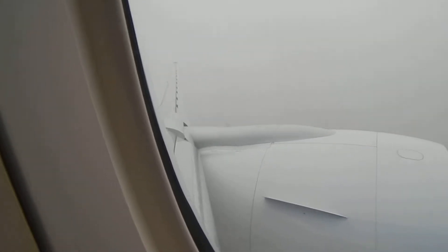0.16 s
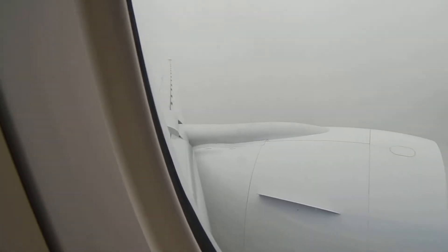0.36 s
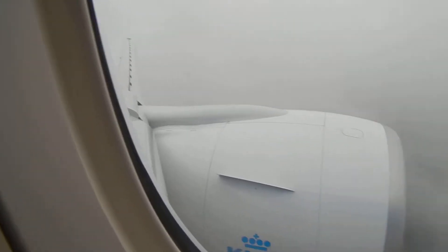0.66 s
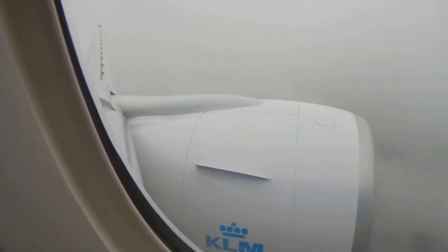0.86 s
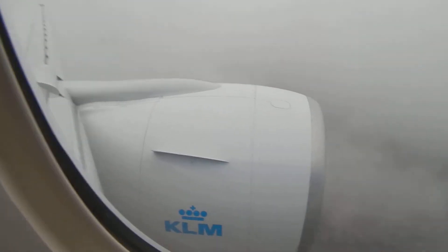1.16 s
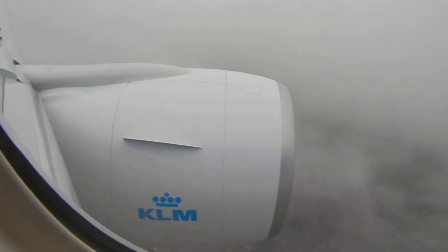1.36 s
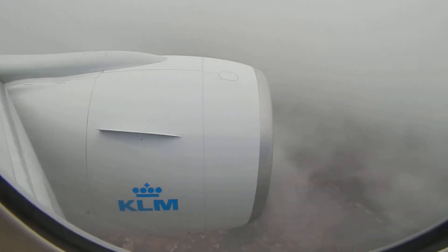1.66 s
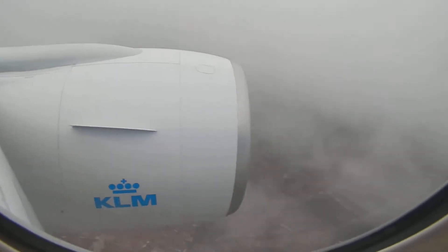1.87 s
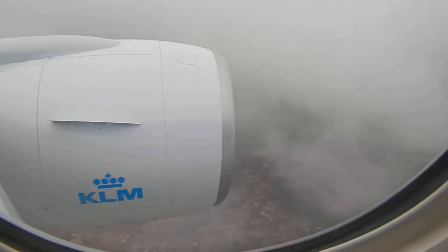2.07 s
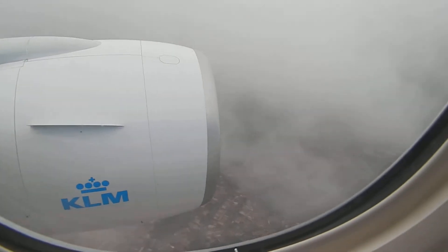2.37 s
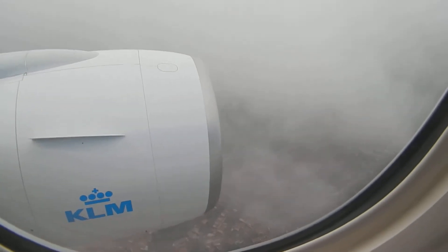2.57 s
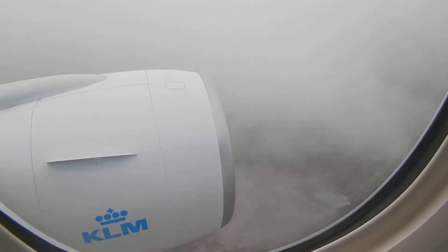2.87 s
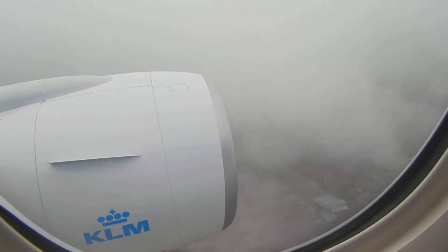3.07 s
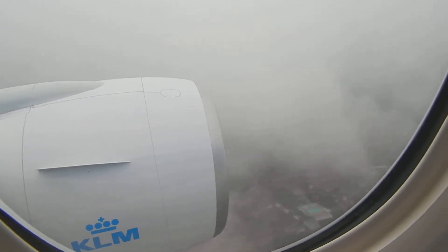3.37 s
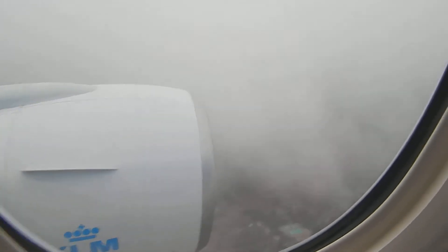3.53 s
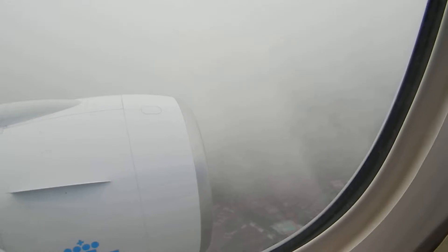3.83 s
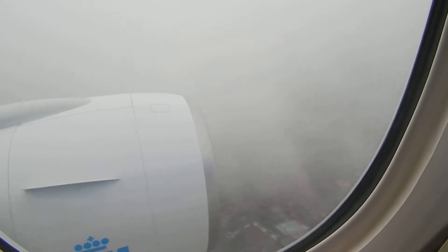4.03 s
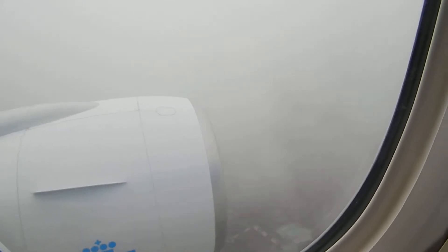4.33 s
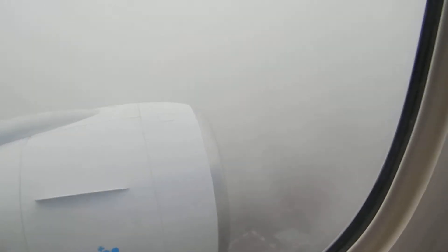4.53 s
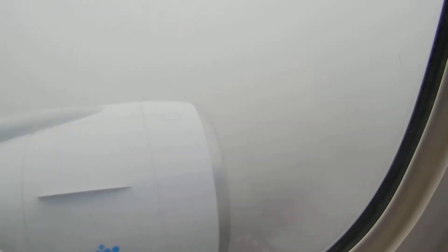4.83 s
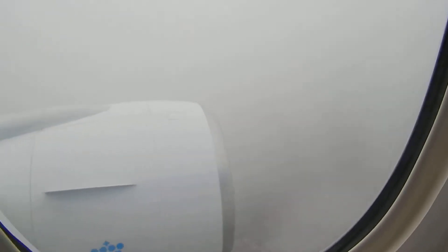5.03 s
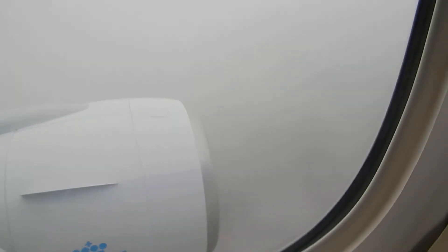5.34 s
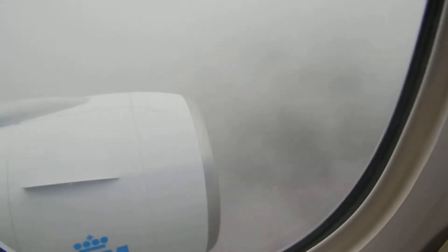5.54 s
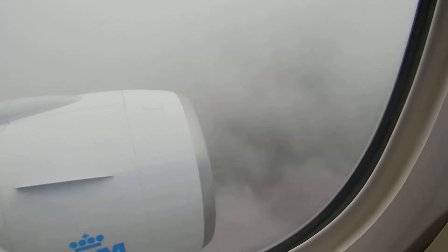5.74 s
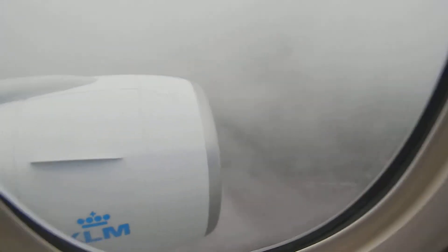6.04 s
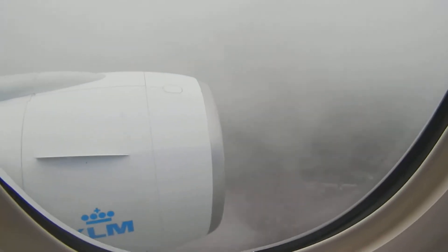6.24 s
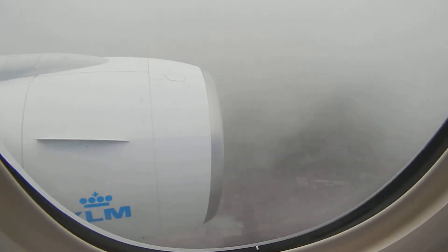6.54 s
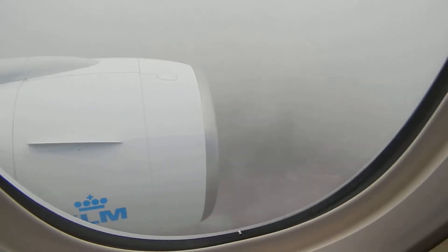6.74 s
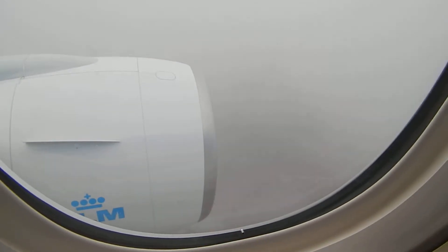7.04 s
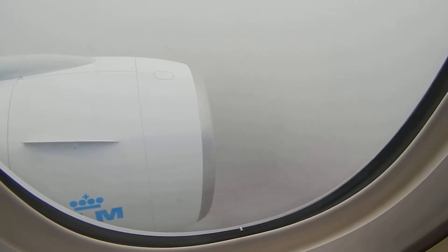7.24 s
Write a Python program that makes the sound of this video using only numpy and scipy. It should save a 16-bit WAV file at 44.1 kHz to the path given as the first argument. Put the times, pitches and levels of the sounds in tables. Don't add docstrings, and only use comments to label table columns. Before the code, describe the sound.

Inside an airliner beside the window, a loud deep boom buffets unevenly over a low engine drone and muffled air rush. The small handheld stereo microphone overloads about four times a second, its level dipping with a dry tick and creeping back. Soft bright hiss and cloth brushes lie on top; the seat creaks most clearly just after three seconds.

```python
import sys
import numpy as np
from scipy import signal
from scipy.fft import rfft, irfft, next_fast_len
from scipy.io import wavfile
from scipy.ndimage import uniform_filter1d, minimum_filter1d

SR = 44100
rng = np.random.default_rng(int(sys.argv[2]) if len(sys.argv) > 2 else 0)


def master_out(mix):
    frames = np.transpose(np.atleast_2d(mix))
    ceiling = np.clip(frames, -1, 1)
    pcm = np.round(ceiling * 32767).astype(np.int16)
    wavfile.write(sys.argv[1], SR, pcm)


def invert_db(level):
    return 10 ** (np.asarray(level, dtype=float) / 20)


N = 326340

# (time [s], strength [dB], lean towards the deep modes [dB])
BUFFET = [(0.0, -15.5, 1), (0.31, -12, -1.5), (1.28, -13, 0.5), (1.34, -12, -3), (1.96, -14, -1.5),
          (2.04, -15, -0.5), (2.12, -11.5, 0), (4.47, -13.5, 1.5), (5.73, -11, 0.5), (5.77, -14.5, -2),
          (6.14, -10.5, -0.5), (6.33, -15.5, 1.5), (6.62, -9.5, 0.5), (6.68, -14, 2.5), (6.78, -9, 1),
          (7.11, -15.5, 1.5), (7.13, -9.5, 0.5), (7.4, -12.5, 0.5)]
# (frequency [Hz], density [dB per Hz])
BOOM_SPECTRUM = [(15, -54), (25, -32), (60, -13.5), (97, -2.5), (112, -1), (150, 0), (180, -10.5),
                 (200, -6), (245, -21), (270, -28.5), (340, -53.5), (570, -120)]
# (frequency [Hz], density [dB per Hz])
DRONE_SPECTRUM = [(150, -34), (250, -13), (275, -13), (325, 1.5), (342, -4.5), (385, 1.5), (398, 0),
                  (448, 3), (472, -9.5), (495, -7.5), (520, -19), (560, -29.5), (730, -43.5), (1230, -120)]
# (frequency [Hz], density [dB per Hz])
RUSH_SPECTRUM = [(310, -31), (520, -0.5), (761, -5), (855, -9), (1360, -18.5), (1480, -21.5), (1650, -19.5),
                 (1810, -22.5), (2100, -21.5), (2460, -26.5), (2760, -26), (4540, -36.5), (6500, -44.5),
                 (8450, -72), (14300, -120)]
# (frequency [Hz], density [dB per Hz])
WIDE_SPECTRUM = [(15, -46.5), (25, -18.5), (113, 1.5), (157, 1), (281, -21.5), (408, -9), (448, -3),
                 (680, -22.5), (1080, -25), (1370, -23.5), (1810, -28.5), (2130, -29.5), (2450, -29),
                 (6500, -44), (8450, -74), (14300, -120)]
# (frequency [Hz], width [Hz], centre level [dB], left-right difference level [dB])
WHINES = [(785, 69, -55, -57.5), (1315, 70, -58, -62), (1395, 19, -58, -61), (1662, 26, -57.5, -64),
          (1692, 12, -62.5, -70), (2070, 45, -63.5, -65.5), (2138, 30, -63, -66), (2690, 80, -72, -72),
          (2863, 16, -72, -73), (3520, 300, -67.5, -68)]
# (time [s], whine gain [dB])
WHINE_SWELL = [
    (0, 5),
    (2, 3),
    (3.5, 0),
    (4.5, 0),
    (6, 3),
    (7.4, 1),
]
# (time [s], level [dB])
RUSTLE_LEVEL = [(0.0, -72), (0.49, -65), (0.91, -67.5), (1.44, -64), (1.65, -68.5), (3.21, -62),
                (3.46, -64.5), (4.31, -66.5), (4.45, -62), (5.91, -62.5), (6.33, -67), (6.7, -62.5),
                (7.13, -66), (7.4, -61)]
# (frequency [Hz], density [dB per Hz])
HISS_SPECTRUM = [(2940, -33), (5000, -11.5), (7340, -5), (9380, -3.5), (11400, -4.5), (14900, -17),
                 (15300, -24.5), (15500, -35)]
# (frequency [Hz], level [dB rms])
BUZZ_TONES = [(10724, -89), (12252, -84.5), (12764, -92), (13275, -82), (13787, -87.5), (14293, -91),
              (14804, -93), (15315, -99)]
# (time [s], length [s], level [dB], left-right difference [dB])
CLOTH = [(0.257, .012, -52.5, 3), (0.43, 0.0074, -65.5, 0.5), (1.289, 0.0075, -54.5, 4),
         (1.479, .012, -65, 4.5), (2.71, .015, -62, -4.5), (2.737, .049, -60, 0), (3.269, 0.018, -54, 0.7),
         (4.29, .008, -49.5, -0.5), (4.438, 0.21, -58.5, 2), (4.794, .01, -50, 0.3),
         (4.819, 0.027, -48, 4.5), (4.864, .006, -51.5, 4), (5.22, .05, -53.5, 1.5),
         (5.465, .044, -53, 1.5), (5.522, .0074, -56, 0.3), (5.696, .06, -58.5, 2), (5.87, .029, -51, 7.5),
         (5.928, 0.04, -60.5, 1), (6.38, .01, -60.5, 0.8), (6.576, .015, -54.5, 2.1),
         (7.375, .034, -59.5, -1.1)]
# (time [s], length [s], centre [Hz], width [Hz], level [dB])
CREAKS = [(.532, 0.02, 3600, 80, -54), (.52, .05, 3620, 200, -60), (3.185, .028, 3600, 500, -58),
          (3.274, .045, 1960, 250, -45.5), (3.28, .05, 1600, 200, -49), (3.322, .06, 2400, 600, -51),
          (3.35, 0.02, 2010, 200, -49), (4.796, 0.011, 6000, 900, -46.5), (4.797, .012, 4700, 500, -53),
          (4.805, .02, 4100, 500, -55), (5.88, 0.035, 3800, 2500, -52), (6.02, 0.0041, 3500, 1500, -51),
          (6.587, 0.037, 4200, 2000, -62)]
# (time [s], drop [dB])
SNAPS = [(.262, 3), (.5706, 4), (.784, 4.5), (1.0346, 4), (1.1722, 2.5), (1.4183, 3.5), (1.6311, 4.5),
         (1.8907, 4.5), (2.1967, 1.5), (2.3621, 3), (2.5916, 3.5), (2.8114, 3), (2.968, 3.5), (3.387, 5.5),
         (3.5617, 4.5), (3.8609, 4.5), (4.1276, 9), (4.5373, 4), (4.8453, 5), (5.2318, 4.5), (5.5054, 3),
         (5.7235, 2), (6.0334, 3), (6.1455, 2), (6.246, 4.5), (6.6253, 3), (6.9025, 2.5), (6.9848, 4),
         (7.3397, 1.7)]
# (time [s], drop [dB])
GRAZES = [
    (2.0835, 1.7),
    (5.7459, 3.5),
]
# (frequency [Hz], width [Hz])
NOTCHES = [(2503, 63), (7503, 72)]

OVERLOADS = SNAPS + GRAZES
START_DROP_DB, RELEASE_S, ATTACK_S, MAKEUP_DB = 14, 0.48, 0.0035, 7
SURGE_HZ, SURGE_S, SURGE_DB, SURGE_SHARE = 132, 0.0048, -4, 0.8
DEEP_DB, UPPER_DB, BOOM_SPLIT_HZ = -4, -2, 115
DRONE_DB, DRONE_FOLLOWS = -24.5, 0.97
RUSH_DB, WIDE_DB = -34.5, -34
RUSTLE_PAN_DB, RUSTLE_SWAY_DB, RUSTLE_SWAY_PER_S = 1.4, 1.5, 3.0
CLOTH_HZ, CLOTH_WIDTH_HZ, CLOTH_SPREAD = 10500, 4800, 0.08
CREAK_PAN_DB = 1.2
TICK_DB, TICK_SPREAD_DB, GRAZE_LOSS_DB = -24.2, 0.8, 8
KINK_FAST_S, KINK_SLOW_S, PRESENCE_DIP = 0.00014, 0.00025, 0.5
SECOND_STEP_S, SECOND_STEP_SHARE = (0.0002, 0.0009), 0.45
CEILING, END_FADE_S = 0.95, 0.003


def rms_one(x):
    return x / np.sqrt(np.mean(x ** 2) + 1e-20)


def in_time(rows):
    s, *columns = np.transpose(rows)
    return [np.interp(np.arange(N) / SR, s, column) for column in columns]


def coloured(spectrum, channels=1):
    size = next_fast_len(N)
    hz = np.maximum(np.arange(size // 2 + 1) * SR / size, 1)
    curve_hz, curve_db = np.transpose(spectrum)
    shape = invert_db(np.interp(np.log(hz), np.log(curve_hz), curve_db))
    white = rng.standard_normal((channels, size))
    return rms_one(irfft(rfft(white) * shape, size)[:, :N])


def evened(x, window_s, share):
    window = int(window_s * SR)
    power = uniform_filter1d(uniform_filter1d(x ** 2, window), window)
    return rms_one(x / (power + 1e-3) ** (share / 2))


def drift(rate):
    r = np.exp(-80 * np.pi * rate / SR)
    white = rng.standard_normal(N // 40 + 2002)
    slow = signal.lfilter([1], [1, -2 * r, r * r], white)[2000:]
    return np.interp(np.arange(N) / 40, np.arange(len(slow)), rms_one(slow))


def resonance(x, hz, width_hz):
    r = np.exp(-np.pi * width_hz / SR)
    return signal.lfilter([1, 0, -1], [1, -2 * r * np.cos(2 * np.pi * hz / SR), r * r], x)


def at_snaps(values):
    marks = np.full(N, 1e-18)
    marks[[round(s * SR) for s, _ in OVERLOADS]] = values
    return marks


def near_snaps(values, shape):
    t = np.arange(-1000, 1001) / SR - 0.0026
    return signal.fftconvolve(at_snaps(values), shape(t), "same")


def surge_outline(t):
    return np.exp(-0.5 * (t / SURGE_S) ** 2)


def polarity():
    return np.sign(np.sin(np.array(OVERLOADS)[:, 0] * 1000))


def gain_db():
    drops = at_snaps(np.array(OVERLOADS)[:, 1])
    drops[0] = START_DROP_DB
    release, attack = np.exp(-1 / (RELEASE_S * SR)), np.exp(-1 / (ATTACK_S * SR))
    held = signal.lfilter([1], [1, -release], drops)
    reduction, _ = signal.lfilter([1 - attack], [1, -attack], held, zi=[attack * START_DROP_DB])
    return MAKEUP_DB - reduction


def hull():
    buffet_db, lean_db = in_time(BUFFET)
    low = signal.butter(4, BOOM_SPLIT_HZ, "low", fs=SR, output="sos")
    high = signal.butter(4, BOOM_SPLIT_HZ, "high", fs=SR, output="sos")
    deep = evened(signal.sosfilt(low, coloured(BOOM_SPECTRUM)[0]), window_s=0.1, share=0.82)
    upper = evened(signal.sosfilt(high, coloured(BOOM_SPECTRUM)[0]), window_s=0.08, share=0.42)
    boom = invert_db(buffet_db + DEEP_DB + lean_db) * deep
    boom = boom + invert_db(buffet_db + UPPER_DB - lean_db) * upper
    boom = boom * np.clip(1 - SURGE_SHARE * near_snaps(0.94, surge_outline), 0, 1)
    drone_db = DRONE_DB + DRONE_FOLLOWS * (buffet_db - buffet_db.mean())
    drone = invert_db(drone_db) * evened(coloured(DRONE_SPECTRUM)[0], window_s=0.3, share=0.1)
    slow_gain_db = uniform_filter1d(gain_db(), SR // 10)
    return (boom + drone * invert_db([[0.4], [-0.4]])) * invert_db(-slow_gain_db)


def airflow():
    mid = invert_db(RUSH_DB - 1.0 + 1.0 * drift(35)) * coloured(RUSH_SPECTRUM)[0]
    side = invert_db(WIDE_DB + 0.6 * drift(8)) * coloured(WIDE_SPECTRUM)[0]
    swell = invert_db(in_time(WHINE_SWELL)[0])
    for hz, width_hz, mid_db, side_db in WHINES:
        once = resonance(rng.standard_normal((2, N)), hz, width_hz)
        whine = resonance(once, hz, width_hz) * swell
        mid = mid + invert_db(mid_db) * rms_one(whine[0])
        side = side + invert_db(side_db) * rms_one(whine[1])
    return mid + side * [[1], [-1]]


def rustle():
    level_db, = in_time(RUSTLE_LEVEL)
    pan_db = RUSTLE_PAN_DB + RUSTLE_SWAY_DB * drift(RUSTLE_SWAY_PER_S)
    flutter_db = 1.0 * drift(25) + 0.69 * drift(120)
    steady_db = level_db - uniform_filter1d(gain_db(), SR // 3) + 3.0 + flutter_db
    return invert_db(steady_db + pan_db * [[0.5], [-0.5]]) * coloured(HISS_SPECTRUM, channels=2)


def buzz():
    t = np.arange(N) / SR
    tones = np.zeros(N)
    for hz, level_db in BUZZ_TONES:
        tones += invert_db(level_db + 4.5) * np.sin(2 * np.pi * (hz * t + rng.random()))
    return tones * invert_db([[-6.0], [4.0]])


def brushes():
    puffs = []
    for s, length_s, level_db, pan_db in CLOTH:
        hz = CLOTH_HZ * (1 + CLOTH_SPREAD * rng.uniform(-1, 1))
        puffs.append((s, length_s, hz, CLOTH_WIDTH_HZ, level_db, pan_db))
    for creak in CREAKS:
        puffs.append((*creak, CREAK_PAN_DB))
    out, white = np.zeros((2, N)), rng.standard_normal((3, N))
    for s, length_s, hz, width_hz, level_db, pan_db in puffs:
        span = slice(max(int((s - length_s) * SR), 0), min(int((s + length_s) * SR), N))
        alike = np.clip(1.1 - hz / 8000, 0, 1)
        noise = np.sqrt(alike) * white[2, span] + np.sqrt(1 - alike) * white[:2, span]
        once = resonance(noise, hz, 1.2 * width_hz)
        puff = rms_one(resonance(once, hz, 1.2 * width_hz))
        level = invert_db(level_db + pan_db * np.array([[0.5], [-0.5]]))
        out[:, span] += level * puff * np.hanning(puff.shape[1])
    return out


def surges():
    def cycles(t):
        return -np.cos(2 * np.pi * SURGE_HZ * t) * surge_outline(t)
    return invert_db(SURGE_DB) * near_snaps(polarity(), cycles)


def ticks():
    level_db = TICK_DB + TICK_SPREAD_DB * rng.standard_normal(len(OVERLOADS))
    level_db[len(SNAPS):] -= GRAZE_LOSS_DB
    steps = at_snaps(invert_db(level_db) * polarity())
    first = np.flatnonzero(abs(steps) > 1e-9)
    lag_s = rng.uniform(*SECOND_STEP_S, len(first))
    share = SECOND_STEP_SHARE * rng.uniform(-0.86, 1, len(first))
    steps[first + (lag_s * SR).astype(int)] = share * steps[first]
    fast, slow = np.exp(-1 / (KINK_FAST_S * SR)), np.exp(-1 / (KINK_SLOW_S * SR))
    kinks = signal.lfilter([1], np.convolve([1, -fast], [1, -slow]), steps)
    kinks = kinks - PRESENCE_DIP * signal.lfilter(*signal.iirpeak(6000, 1.1, fs=SR), kinks)
    return signal.sosfilt(signal.butter(1, 150, "high", fs=SR, output="sos"), kinks)


def limited(x):
    peak = np.abs(x).max(axis=0) + 1e-9
    room = minimum_filter1d(np.minimum(CEILING / peak, 1), size=401)
    return x * uniform_filter1d(uniform_filter1d(room, size=200), size=200)


def scene():
    return hull() + airflow() + rustle() + buzz() + brushes() + surges()


def low_pass(x):
    return signal.sosfilt(signal.butter(12, 15700, fs=SR, output="sos"), x)


def record(dry):
    x = dry * invert_db(gain_db()) + ticks()
    for hz, width_hz in NOTCHES:
        x = signal.lfilter(*signal.iirnotch(hz, hz / width_hz, fs=SR), x)
    fade = np.minimum(np.arange(N)[::-1] / (END_FADE_S * SR), 1)
    return low_pass(limited(x) * fade)


dry = scene()
out = record(dry)
master_out(out)
```